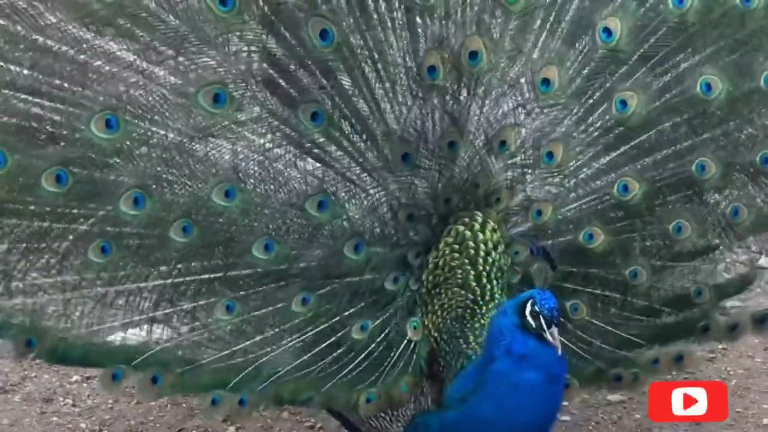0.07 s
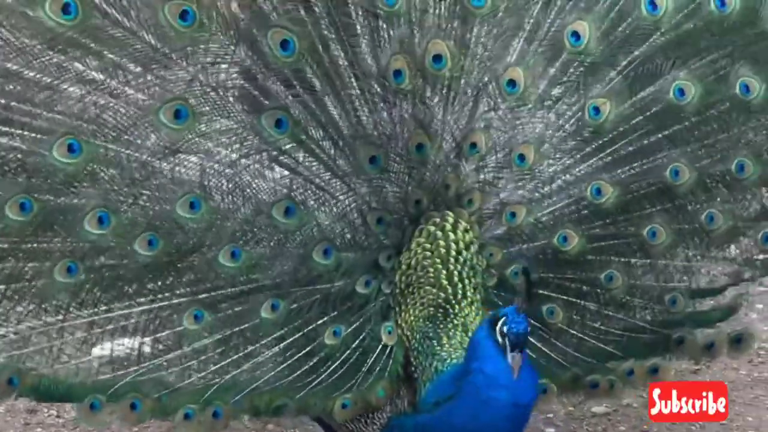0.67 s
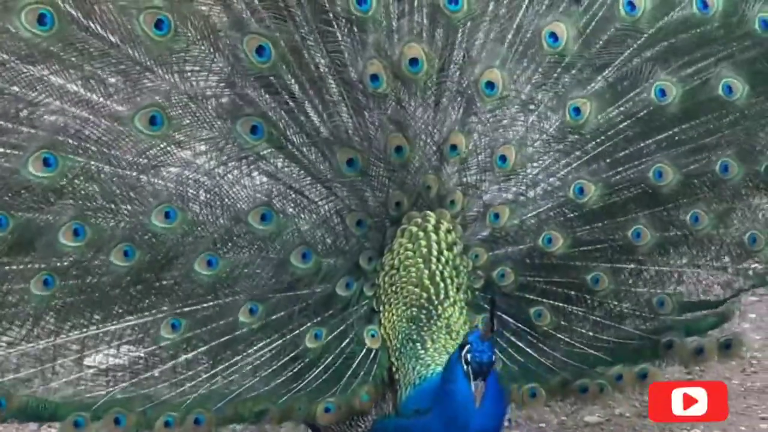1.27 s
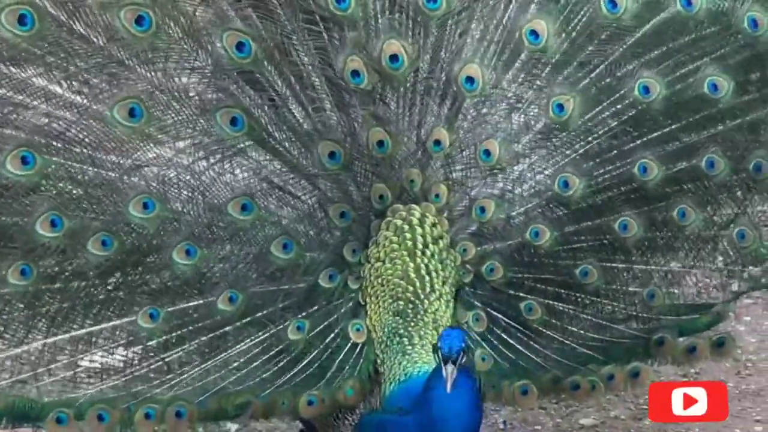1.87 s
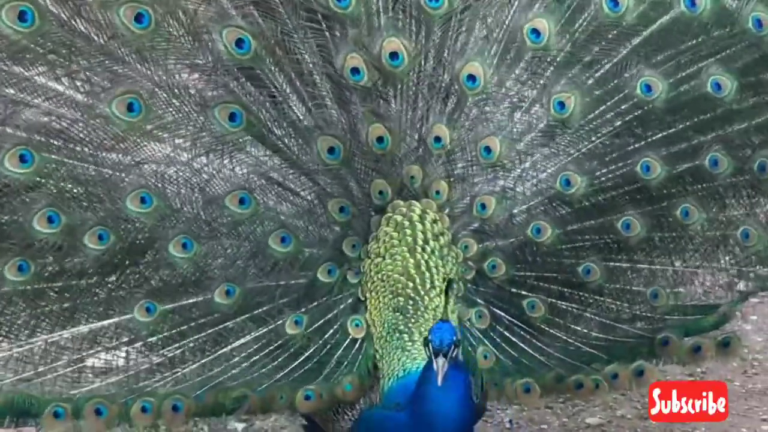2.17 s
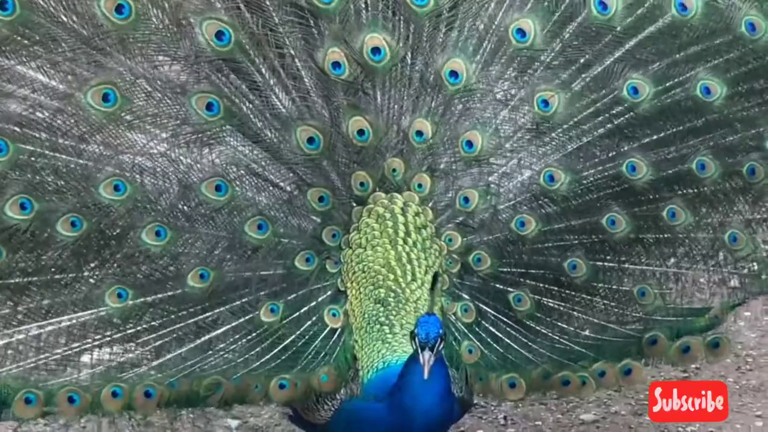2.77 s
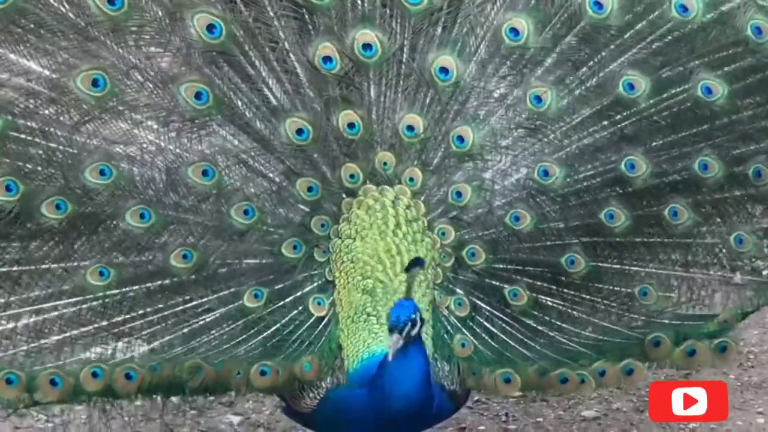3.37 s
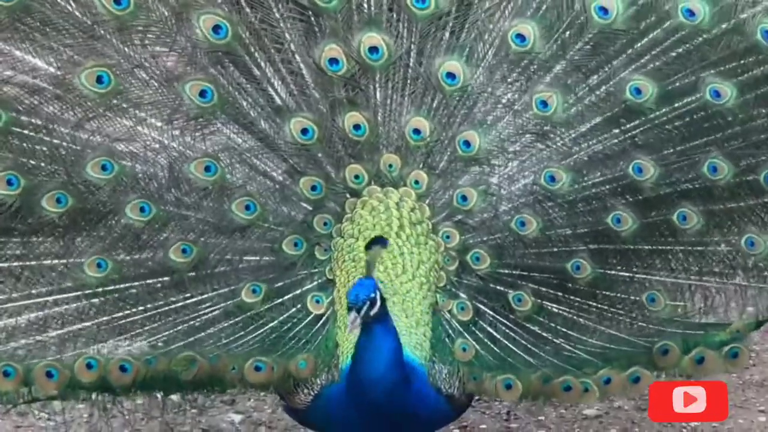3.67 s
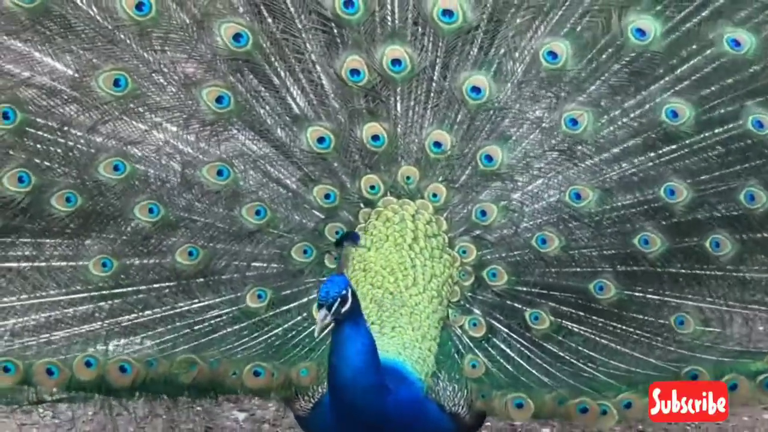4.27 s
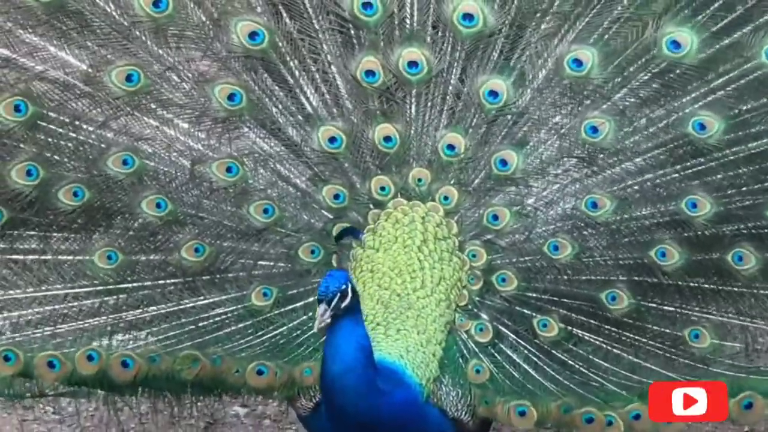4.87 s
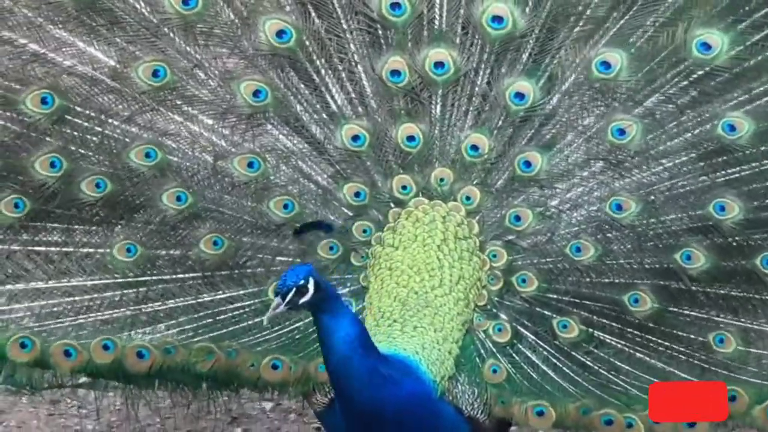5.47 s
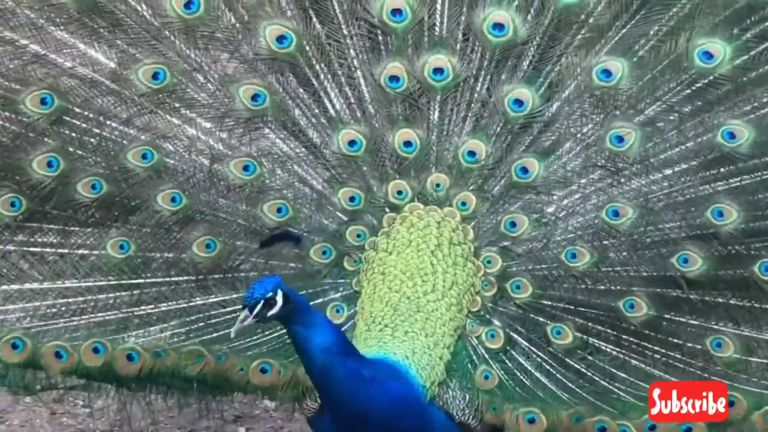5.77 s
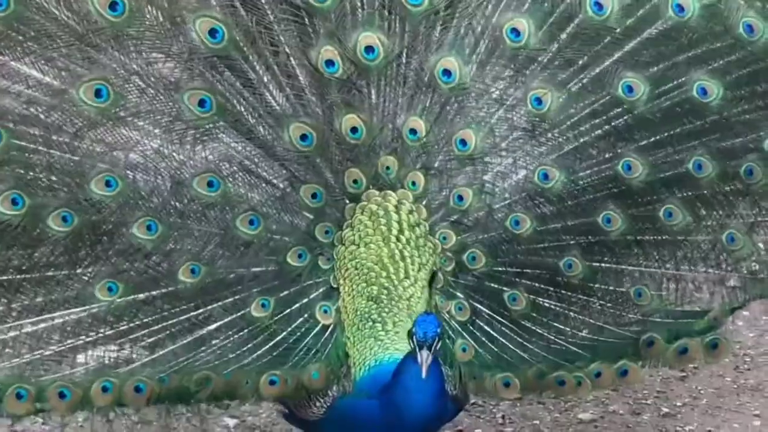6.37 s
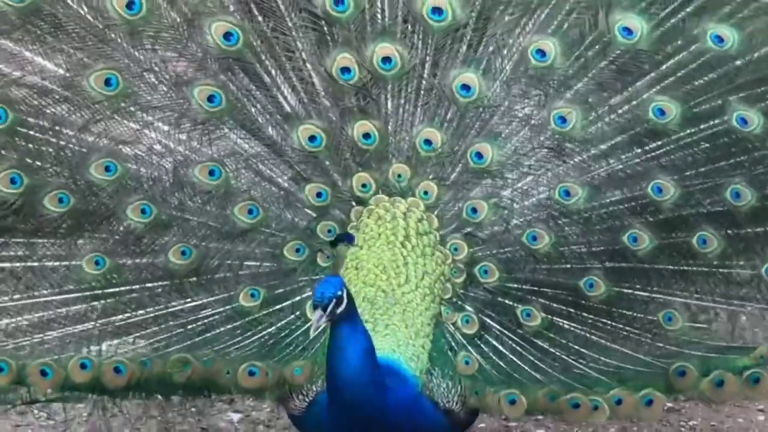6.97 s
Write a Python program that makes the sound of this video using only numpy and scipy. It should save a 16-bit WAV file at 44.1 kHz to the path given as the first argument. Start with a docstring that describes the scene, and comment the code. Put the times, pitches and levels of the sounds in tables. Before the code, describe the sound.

Outdoors, faint chirps and a short dry rustle of feathers sit over quiet town noise and a barely audible idling engine. A nearby peacock lets out a loud, clear wail that rises and falls, echoing off a wall. After a pause its quills rattle and puff air at the microphone as it wails again. A third, slightly lower cry follows quickly and fades into the soft background.

```python
"""Peacock wailing in a park

A displaying peacock cries three times, each a clean harmonic arch from the syrinx, coloured by the throat.
A wall throws it back a sixth of a second later, so two pitch lines cross. His train rattles its quills
and fans air at the microphone; small birds chirp in the trees and an engine idles far off."""
import sys
import numpy as np
from scipy import signal
from scipy.fft import rfft, irfft, next_fast_len
from scipy.io import wavfile
from scipy.ndimage import uniform_filter1d

SR = 44100
rng = np.random.default_rng(int(sys.argv[2]) if len(sys.argv) > 2 else 0)


def master_out(mix):
    """Clip the mix to full scale and print it as 16-bit PCM to the path in sys.argv[1]."""
    frames = np.transpose(np.atleast_2d(mix))
    ceiling = np.clip(frames, -1, 1)
    pcm = np.round(ceiling * 32767).astype(np.int16)
    wavfile.write(sys.argv[1], SR, pcm)


N = 309582
TIME = np.arange(N) / SR
# pitch of every cry: at the start, where the opening syllable breaks into the wail, and at the end
START_HZ, BREAK_HZ, END_HZ = 688.7, 731.3, 690.7


def undb(db):
    """Decibels to gain."""
    return 10 ** (np.asarray(db) / 20)


def unit(x):
    """Scale to rms 1."""
    return x / np.sqrt(np.mean(x ** 2))


def db_at(hz, points):
    """Read a (freq_hz, gain_db) curve on a log-frequency axis."""
    points_hz, points_db = np.transpose(points)
    return np.interp(np.log(np.maximum(hz, 1)), np.log(points_hz), points_db)


def colour(x, points):
    """EQ a sound with a (freq_hz, gain_db) curve."""
    size = next_fast_len(x.shape[-1] + SR // 10)
    hz = np.arange(size // 2 + 1) * SR / size
    return irfft(rfft(x, size) * undb(db_at(hz, points)), size)[..., :x.shape[-1]]


def walk(rate):
    """Smooth random drift with rms 1, turning about rate times a second."""
    hold = max(int(SR / rate), 1)
    steps = np.repeat(rng.standard_normal(N)[:N // hold + 1], hold)[:N]
    return unit(uniform_filter1d(uniform_filter1d(steps, hold), hold))


def air(points, likeness, merge_hz):
    """Coloured stereo noise, rms 1; the sides are partly alike below merge_hz and drift apart above."""
    common, own = rng.standard_normal(N), rng.standard_normal((2, N))
    hz = np.geomspace(10, SR / 2, num=200)
    share = likeness / (1 + (hz / merge_hz) ** 2)
    shaped = lambda x, power: colour(x, np.c_[hz, db_at(hz, points) + 10 * np.log10(power)])
    return unit(shaped(common, share) + shaped(own, 1 - share))


def reverb(x, predelay_s, t60_s, likeness=0.41):
    """Scattered reflections of a mono sound, dying away, partly shared by the two sides."""
    t = TIME[:SR * 3 // 2] - predelay_s
    common, own = rng.standard_normal(len(t)), rng.standard_normal((2, len(t)))
    paths = np.sqrt(likeness) * common + np.sqrt(1 - likeness) * own
    response = paths * (t > 0) * undb(-60 * np.abs(t) / t60_s)
    response /= np.sqrt(np.sum(response ** 2, axis=1, keepdims=True))
    return signal.fftconvolve(x[None], response, axes=1)[:, :N]


def pan(db):
    """Left and right gains for a left minus right level."""
    return undb(np.array([[db], [-db]]) / 2)


def park_wash(level_db=-55):
    """A soft, gently wavering bed of distant town and leaves."""
    # tone of the bed: freq_hz, gain_db
    wash_eq = [(15, -23), (35, -5), (90, -2.5), (140, -7), (230, -3), (400, -6), (760, -10.5), (1250, -9),
               (1600, -16), (2300, -22), (5000, -25), (13000, -31.5)]
    return air(wash_eq, likeness=0.46, merge_hz=2500) * undb(level_db + .5 * walk(2.825))


def idling_engine(cycle_hz=12.83, level_db=-65, drift=0.00168, sway_db=1):
    """A far engine throbs on multiples of its slightly drifting cycle rate."""
    # partials of the throb: cycle_multiple, gain_db
    partials = [(2, -0.5), (3, -4), (4, -4), (5, 2.5), (6, -9.5), (7, 2.5), (8, -2), (24, -10), (48, -7)]
    phase = 2 * np.pi * np.cumsum(cycle_hz * (1 + drift * walk(2))) / SR
    throb = 0
    for multiple, db in partials:
        # every partial comes by its own mix of paths to the two sides
        lag = rng.standard_normal() + .5 * rng.standard_normal((2, 1))
        throb += np.sqrt(2) * undb(db + sway_db * walk(4.11)) * np.sin(multiple * phase + lag)
    return undb(level_db) * throb


def small_birds(direct_db=-14, wet_db=-0.5):
    """Thin buzzy chirps that stutter in quick syllables, blurred by the trees."""
    # chirps: start_s, length_s, start_hz, end_hz, level_db
    chirps = [(.03, 0.16, 3990, 4050, -60), (.117, 0.14, 3130, 3310, -60.5), (.389, 0.1, 4240, 4610, -64),
              (1.196, 0.031, 5600, 7120, -56.5), (1.21, 0.16, 4550, 5020, -65.5),
              (1.23, 0.076, 7100, 6900, -66), (3.45, .09, 4020, 3310, -68), (4.354, 0.14, 7100, 6300, -62),
              (5.992, 0.053, 8600, 8420, -53.5)]
    dry = np.zeros(N)
    wobble_hz = 150 * walk(700) + 190 * walk(60)
    syllables = undb(4 * walk(45) - 2)
    for start_s, length_s, start_hz, end_hz, db in chirps:
        now = (TIME >= start_s) & (TIME < start_s + length_s)
        progress = (TIME[now] - start_s) / length_s
        hz = start_hz + (end_hz - start_hz) * progress + wobble_hz[now]
        envelope = undb(db) * syllables[now] * np.sqrt(2 * np.sin(np.pi * progress))
        dry[now] += envelope * np.sin(2 * np.pi * np.cumsum(hz) / SR)
    return undb(direct_db) * dry + undb(wet_db) * reverb(dry, predelay_s=0.0018, t60_s=0.5)


def fanned_air(calm_rumble_db=-62.5, calm_flutter_db=-63, flicker_db=3.5):
    """Puffs from the train swell and fade: they rumble on the microphone as the feathers flutter."""
    # puffs of air: centre_s, half_width_s, rumble_db, flutter_db
    puffs = [(.3, 0.72, -53, -57), (1.25, 0.2, -58, -68), (2.0, 0.014, -44, -53), (4.61, .04, -60, -52.5),
             (4.81, 0.16, -42.5, -49), (5.068, 0.053, -55, -42.5), (5.2, 0.52, -59, -54)]
    # tone of air on the microphone: freq_hz, gain_db
    rumble_eq = [(12, -24), (30, 3.5), (80, 4.5), (130, -7.5), (300, -29), (1000, -61)]
    # tone of the feathers: freq_hz, gain_db
    flutter_eq = [(60, 0), (160, -0.5), (300, -5), (600, -11), (1300, -12), (2200, -19), (8000, -33)]
    centre_s, half_width_s, rumble_db, flutter_db = np.transpose(puffs)
    swells = np.exp(-((TIME[:, None] - centre_s) / half_width_s) ** 2)
    strength = lambda db, calm_db: np.sqrt(swells ** 2 @ undb(db) ** 2 + undb(calm_db) ** 2)
    rumble = air(rumble_eq, likeness=0.68, merge_hz=400) * strength(rumble_db, calm_rumble_db)
    flutter = air(flutter_eq, likeness=0.36, merge_hz=1500) * strength(flutter_db, calm_flutter_db)
    return rumble + flutter * undb(flicker_db * walk(30))


def quills(ring_db=-6, ring_q=5, wet_db=-14):
    """The train's stiff shafts slip over each other in bursts of tiny clicks that ring the quill."""
    # scrapes and ticks: start_s, decay_s, level_db, ring_hz
    scrapes = [(.788, .011, -55, 4800), (0.815, 0.018, -52, 4740), (.843, .043, -53.5, 6300),
               (.912, .037, -52, 6400), (.973, 0.0041, -46, 6500), (1.675, .24, -59, 6000),
               (1.803, 0.02, -49.5, 5950), (1.906, .011, -47.5, 6700), (4.435, 0.18, -57.5, 5200),
               (4.618, .0019, -35.5, 9400), (4.71, 0.015, -47, 6100), (4.728, 0.048, -45.5, 5540),
               (4.788, 0.028, -44, 5800), (4.862, 0.046, -40, 5700), (5.24, 0.038, -42.5, 5300),
               (5.301, 0.011, -45.5, 4110)]
    # tone of the friction: freq_hz, gain_db
    friction_eq = [(800, 12), (2500, 5), (6000, 2), (10000, 5.5), (13000, -3.5)]
    dry = np.zeros((2, N))
    # each slip lasts a few milliseconds and is itself made of finer clicks
    slips = undb(3 * walk(400) + 2.5 * walk(3000))
    friction = unit(colour(rng.standard_normal((2, N)) * slips, friction_eq))
    for start_s, decay_s, db, ring_hz in scrapes:
        now = (TIME >= start_s) & (TIME < start_s + 2 * decay_s)
        burst = friction[:, now] * np.exp(-((TIME[now] - start_s) / decay_s) ** 2)
        ring = np.sqrt(ring_q) * signal.lfilter(*signal.iirpeak(ring_hz, ring_q, fs=SR), burst)
        dry[:, now] += undb(db) * (burst / 2 + undb(ring_db) * ring)
    return dry + undb(wet_db) * reverb(dry.mean(axis=0), predelay_s=.003, t60_s=0.75)


def pitch_arch(t, start_s, break_s, top_s, end_s, top_hz, rise_power, sag_power):
    """Pitch of a cry and progress of its fall (0-1): a low syllable, a leap, a sag, a sudden collapse."""
    collapse_share, collapse_power = .24, 14.3
    opening_hz = np.interp(t, [start_s, break_s], [START_HZ, BREAK_HZ])
    climbed = 1 - np.interp(t, [break_s, top_s], [1, 0]) ** rise_power
    fall = np.interp(t, [top_s, end_s], [0, 1])
    sunk = (1 - collapse_share) * fall ** sag_power + collapse_share * fall ** collapse_power
    return opening_hz + (top_hz - BREAK_HZ) * climbed - (top_hz - END_HZ) * sunk, fall


def cry(row, jitter=.0016, rasp=0.0041, shimmer_db=1.35, fade_s=.01):
    """The syrinx sings one slightly unsteady harmonic stack; the throat colours its overtones."""
    # how harmonics 1, 2, 3 and the overtones above answer the bird's effort, a row each:
    # base_db, slack_db, attack_db, catch_db, fall_db
    effort_response = [(-44, -20, -3, -1, 3.5), (-44.3, -4.5, -4.5, -12, -1.5), (-52, -6.5, -6, 4, 8.5),
                       (-69, 0, -15, 10.5, 6.5)]
    # throat resonances that the overtones glide through: freq_hz, gain_db
    throat_eq = [(2850, 10.5), (3150, 5), (3370, 11.5), (3850, 2.5), (4400, 0.5), (4750, -1.5), (5350, 0.5),
                 (6050, -5.5), (6650, -5), (7550, -11.5), (8500, -18), (12000, -39)]
    attack_s, catch_s, open_s, close_s = 0.02, 0.022, .012, 0.032
    start_s, break_s, top_s, end_s, top_hz, rise_power, sag_power, *dynamics = row
    level_db, bright_db, catch_depth, full_from_s, full_to_s, *full_db, brass_db = dynamics
    now = (TIME > start_s - fade_s / 2) & (TIME < end_s + fade_s / 2)
    t = TIME[now]
    hz, fall = pitch_arch(t, start_s, break_s, top_s, end_s, top_hz, rise_power, sag_power)

    # the voice is slack at low pitch, takes a moment to speak, catches at the break, then opens fully
    slack = np.clip((top_hz - hz) / (top_hz - END_HZ), 0, 1) ** 1.87
    attack = np.exp(-(t - t[0]) / attack_s)
    catch = catch_depth * np.exp(-((t - break_s) / catch_s) ** 2)
    full_voice = (np.tanh((t - full_from_s) / open_s) - np.tanh((t - full_to_s) / close_s)) / 2
    effort = np.array([np.ones(len(t)), slack, attack, catch, fall])
    *low_db, overtone_db = level_db + np.array(effort_response) @ effort + np.outer(full_db, full_voice)
    # brassy at the top of the arch; with less pressure the pitch sags and the high overtones go first
    tilt_db = 1 + brass_db * full_voice - 44 * (1 - hz / top_hz) - fall
    high_db = [overtone_db + bright_db + db_at(k * hz, throat_eq) + np.sqrt(k - 4) * tilt_db
               for k in range(4, 13)]

    roughness = (jitter + rasp * fall ** 2) * walk(160)[now]
    phase = 2 * np.pi * np.cumsum(hz * (1 + roughness)) / SR
    stack = sum(np.sqrt(2) * undb(db) * np.sin(k * phase) for k, db in enumerate(low_db + high_db, 1))
    fades = np.clip(np.minimum(t - t[0], t[-1] - t) / fade_s, 0, 1)
    out = np.zeros(N)
    out[now] = stack * fades * undb(shimmer_db * walk(70)[now])
    return out


def peacock(direct_db=-1, near_db=-5, tail_db=-7.0, wall_db=-1.64, wall_delay_s=.158):
    """The cries arrive directly, off the ground and fence close by, off the far wall, and from trees."""
    # cries: start_s, break_s, top_s, end_s, top_hz, rise_power, sag_power, level_db, bright_db,
    # catch_depth (0-1), full_from_s, full_to_s, then what full voice adds:
    # fundamental_db, second_db, third_db, overtones_db, brass_db
    cries = [(1.656, 1.74, 2.01, 2.445, 951, 3.23, 1.65, 0, -2.5, 0.92, 1.936, 2.09, 9, 3, -3, 4.5, 3),
             (4.647, 4.744, 4.99, 5.41, 943, 2.9, 1.7, 0.3, 0, 0.7, 4.885, 5.02, 12, 1.5, -2.5, -5, 5.5),
             (5.959, 5.996, 6.325, 6.65, 889, 2.8, 2.3, -1.5, 3.5, 0, 6.12, 6.44, 4, -6, 11.5, -0.5, 0.5)]
    # tone of the scattered reflections: freq_hz, gain_db
    scatter_eq = [(700, 6.5), (950, 0.85), (1800, 7.05), (2500, 4.6), (4000, 8.1), (12000, 11)]
    # tone of the wall's slapback: freq_hz, gain_db
    wall_eq = [(700, -6), (950, -21), (1800, 3), (2300, -3), (3600, -18), (10000, -19)]
    voice = sum(cry(row) for row in cries)
    send = colour(voice, scatter_eq)
    near = reverb(send, predelay_s=0.0034, t60_s=0.18)
    tail = reverb(send, predelay_s=.04, t60_s=1.0) * pan(db=-1.0)
    slapback = colour(np.interp(TIME - wall_delay_s, TIME, voice), wall_eq)
    smear = undb(-14) * reverb(slapback, predelay_s=0.00075, t60_s=0.3)
    wall = (slapback + smear) * pan(db=-12.5)
    return undb(direct_db) * voice + undb(near_db) * near + undb(wall_db) * wall + undb(tail_db) * tail


def scene():
    """The peacock and his train up front, birds, park and engine behind."""
    return peacock() + small_birds() + quills() + fanned_air() + park_wash() + idling_engine()


def record(dry):
    """The microphone pair favours the right, the sound drops out for an instant, and the top is cut."""
    # stereo balance: freq_hz, left_minus_right_db
    balance = [(60, -4), (1300, -4.5), (2300, -3.5), (8000, 0)]
    hz, db = np.transpose(balance)
    sides = np.array([colour(x, np.c_[hz, sign * db / 2]) for x, sign in zip(dry, (1, -1))])
    dropout = np.interp(TIME, [.728, .731, .741, .752, .754], [1, .08, 0, 0, 1])
    high_cut = signal.ellip(10, .2, 70, 13400, fs=SR, output="sos")
    return signal.sosfilt(high_cut, sides * dropout)


dry = scene()
out = record(dry)
master_out(out)
```